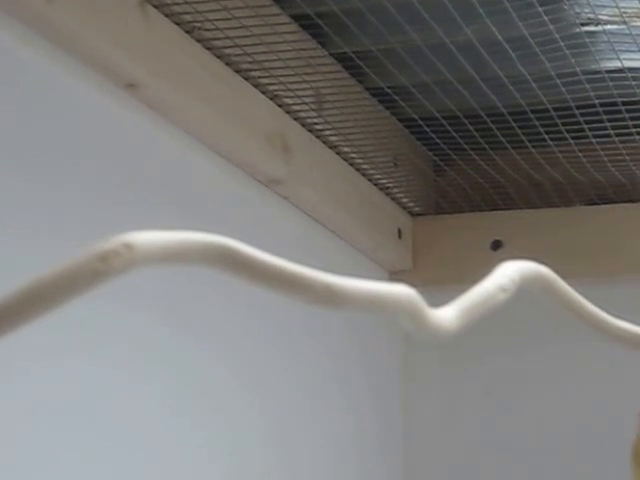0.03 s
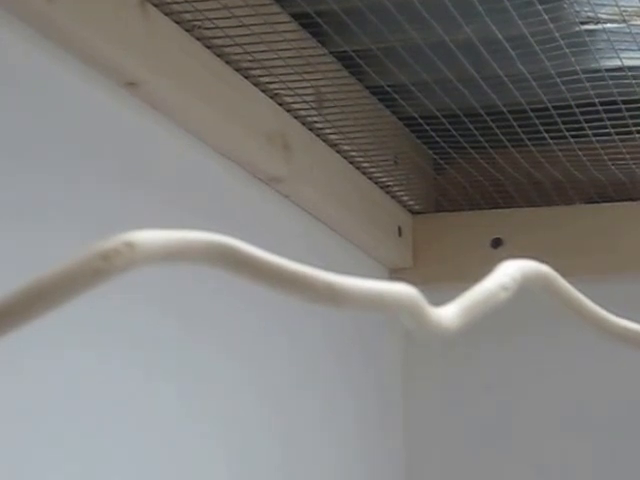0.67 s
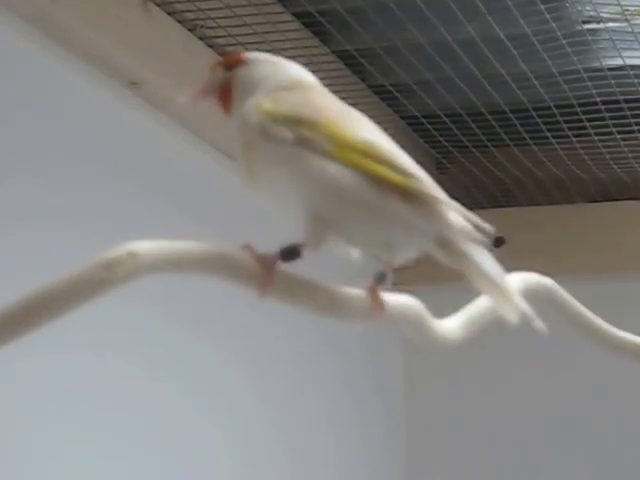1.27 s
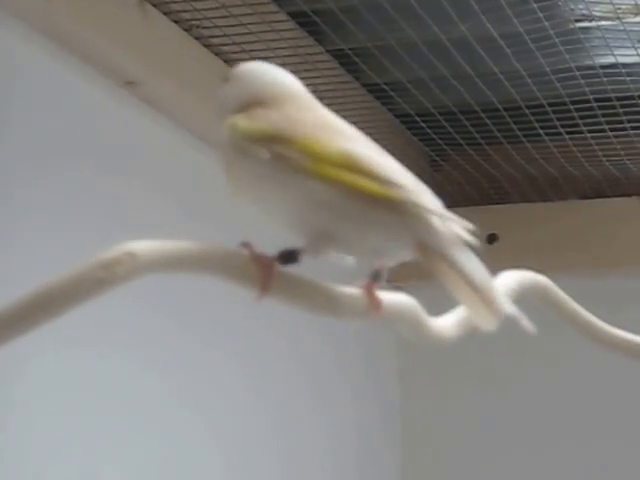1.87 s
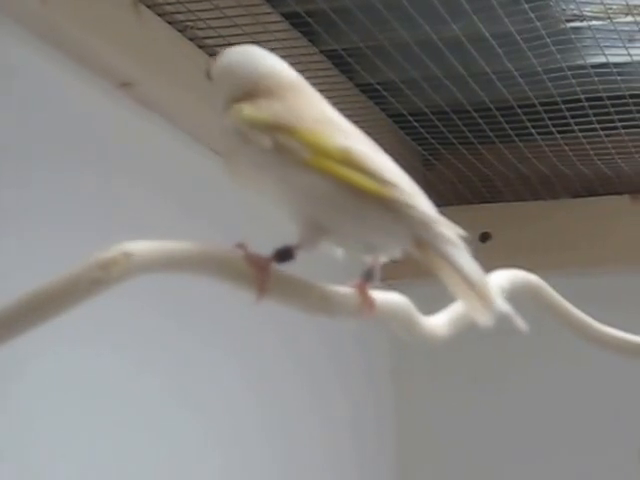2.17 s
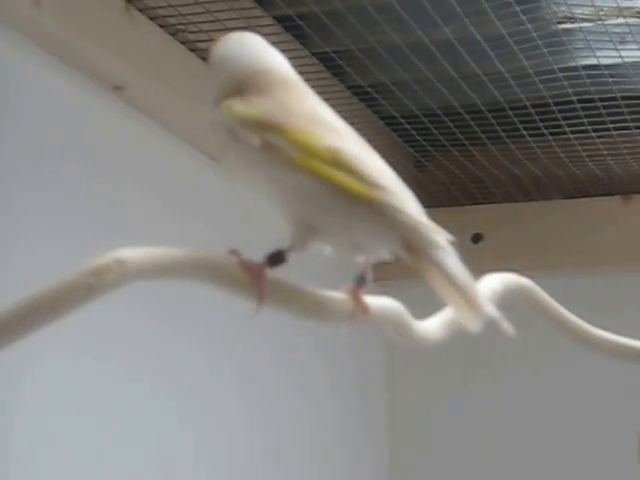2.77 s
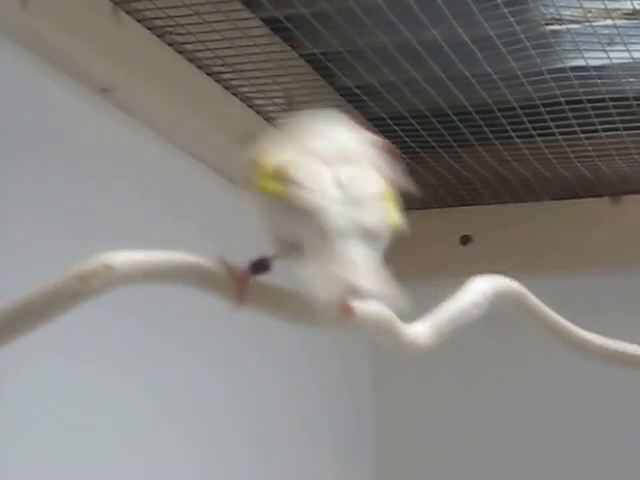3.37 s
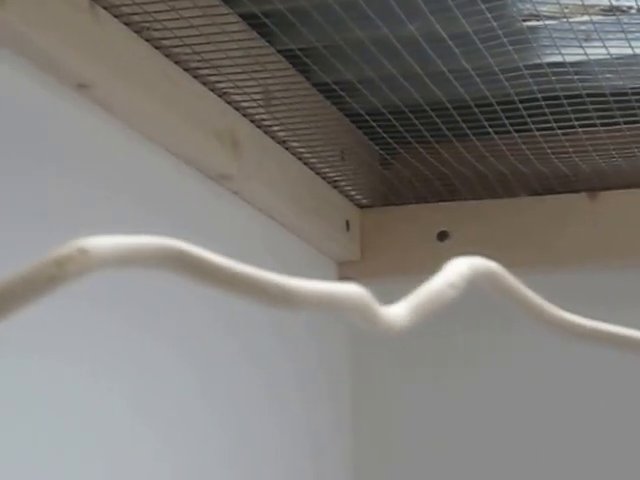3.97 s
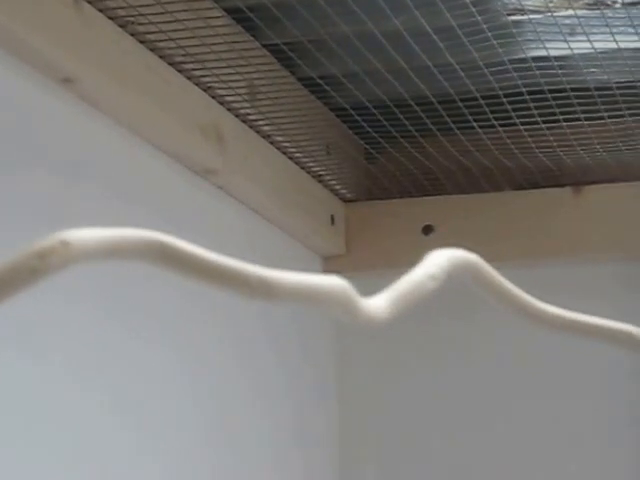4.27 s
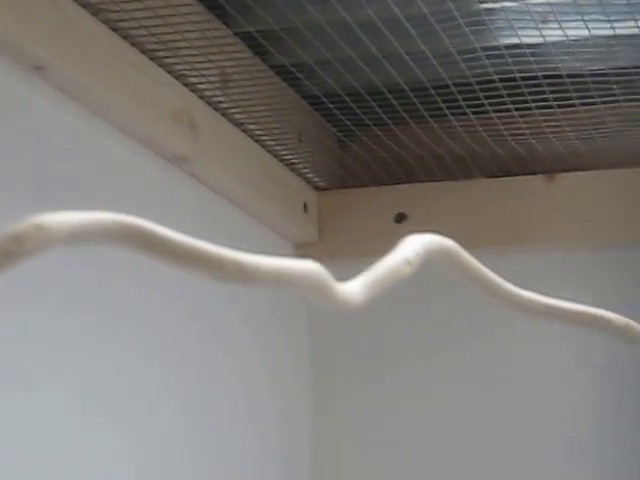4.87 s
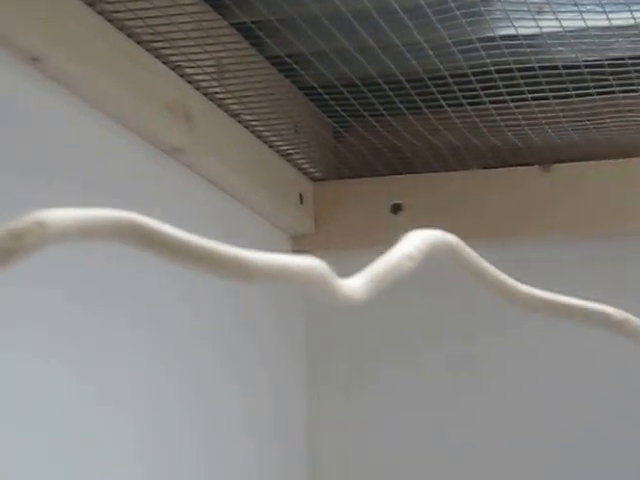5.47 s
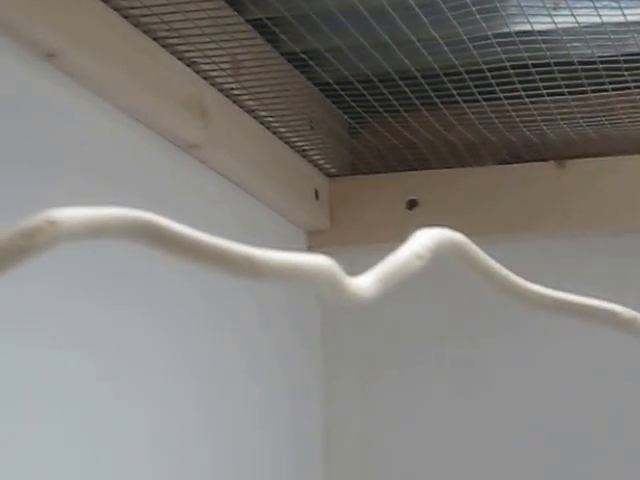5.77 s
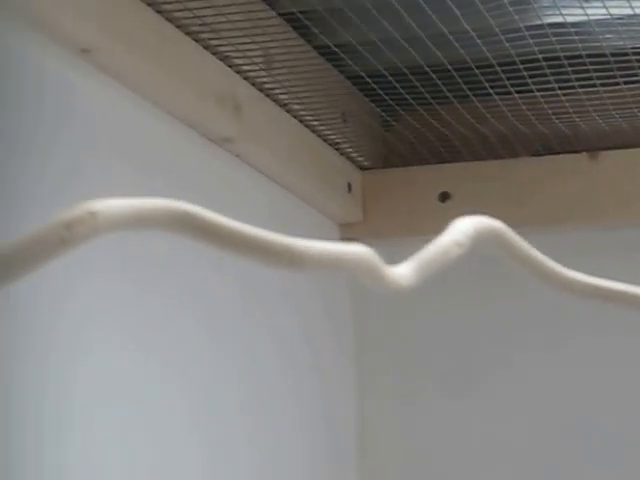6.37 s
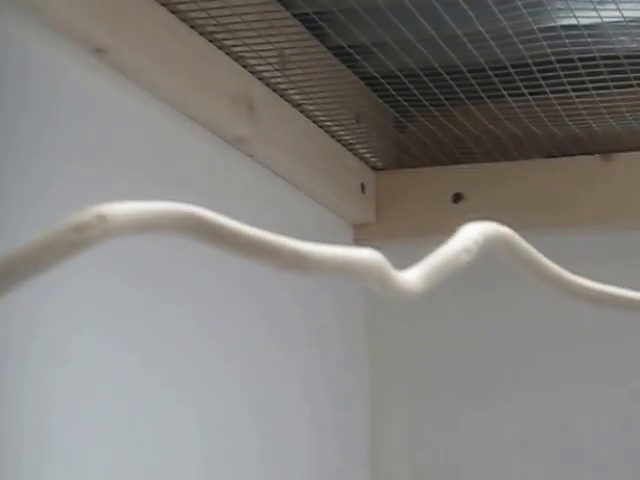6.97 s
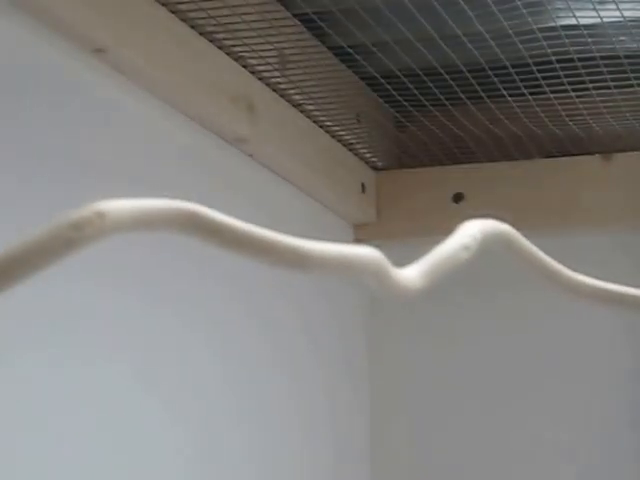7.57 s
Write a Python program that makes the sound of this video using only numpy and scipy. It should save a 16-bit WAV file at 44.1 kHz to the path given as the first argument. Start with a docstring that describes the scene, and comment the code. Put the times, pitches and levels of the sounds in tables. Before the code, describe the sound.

A goldfinch gives four sharp, close pips in a small indoor aviary, amid wing flutters, perch knocks, scattered chirps and a thin electrical whine.

```python
"""A goldfinch gives four sharp pips close to the microphone, sounding both sides of its syrinx at once.
The place is a small indoor aviary with hard walls; other birds peep, chirp and whistle further off.
Wings whirr past, feet knock on perches and wire, and feathers rustle against the mesh.
Room air and a thin electrical whine run throughout; the recorder's limiter ducks under the near pips."""
import sys
import numpy as np
from scipy import signal
from scipy.fft import rfft, irfft
from scipy.io import wavfile
from scipy.ndimage import map_coordinates

SR = 44100
rng = np.random.default_rng(int(sys.argv[2]) if len(sys.argv) > 2 else 0)


def put_to_file(sound):
    """Save the sound as 16-bit audio at rate SR, in the file named by the first command-line argument."""
    columns = np.atleast_2d(sound).T  # one column per channel
    safe = np.clip(columns, -1, 1)
    whole_steps = np.round(safe * 32767)
    wavfile.write(sys.argv[1], SR, whole_steps.astype(np.int16))


N = 336042

# spectrum of room air and microphone hiss: (frequency [Hz], level [dB])
AIR_SPECTRUM = [(20, -4), (60, -3), (110, 4), (230, 1.5), (280, 5), (380, 0.5), (580, 3), (1500, -0.5),
                (3000, -4), (5300, -5), (6400, -10.5), (8200, -1.5), (9000, -4), (10000, 0.5),
                (11700, -4.5), (12600, -14.5), (16000, -15)]
# reverberation of the hard walls: (frequency [Hz], t60 [s])
WALL_DECAY = [(150, 0.51), (1000, 0.43), (3500, 0.24), (6000, 0.24), (12000, 0.15)]
# feathers brushing the wire: (time [s], rise [s], t60 [s], level [dB], wire's ring [dB])
RUSTLES = [(4.105, 0.0038, 0.5, -32, -14), (4.271, 0.028, 0.52, -26.5, -10.5),
           (4.38, 0.033, 0.72, -36.5, -13), (5.548, 0.029, .98, -32, -12.5), (6.335, 0.019, 0.31, -24, -39),
           (6.871, 0.013, 0.12, -35, -15)]
# resonances of the brushed wire: (frequency [Hz], width [Hz], level [dB])
MESH_MODES = [(612, 29, 7.5), (1068, 194, -3), (2128, 53, 3.5), (2388, 21, 7.5), (3910, 72, -17)]
# feet and beaks on perches and wire:
# (time [s], level [dB], frequency the struck spot favours [Hz], ring [dB], thud [dB])
KNOCKS = [(0.548, -37.5, 2700, 0.5, -13), (1.509, -21.5, 5050, -1.5, -10), (1.644, -12, 810, -9.5, -15),
          (2.915, -34, 4124, -7, -15), (2.934, -31, 2680, -9, -25), (3.268, -32, 2730, -9, -20),
          (3.474, -29, 5400, -18, -19), (3.744, -30, 2310, -3, -5), (4.528, -13.5, 3100, -7.5, -25),
          (4.659, -17.5, 2900, -7, -16), (4.712, -31.5, 2300, -0.5, -16), (4.945, -39, 2260, -3, -26),
          (4.984, -34.5, 4060, 4, -43), (5.464, -28, 2270, -13, -26), (5.914, -30.5, 277, 3, -3.5),
          (6.544, -20.5, 560, -5, -15), (6.928, -29, 2670, 0, -29), (6.955, -41.5, 430, 7.5, -7)]
# modes of the wooden frame with its mesh: (frequency [Hz], level [dB], t60 [s])
FRAME_MODES = [(206, -7, 0.21), (288, 0, 0.16), (424, -5, 0.26), (579, 5.5, 0.086), (717, -6, 0.11),
               (867, 8.5, 0.031), (967, 6.5, 0.079), (1338, 9.5, 0.097), (1495, 4, .2), (1810, -1, 0.14),
               (2256, 10.5, 0.055), (2415, 4.5, 0.052), (2705, 10.5, 0.049), (3260, 4, 0.048),
               (3450, 13, 0.043), (4190, 9, 0.03), (4400, 1, 0.16), (4900, -8, 0.12), (5640, -27, 0.18)]
# spectra of the birds' movements: (frequency [Hz], level [dB])
SCRAPE_SPECTRUM = [(100, -19), (400, -6), (1000, -2), (2200, 0.5), (3600, 4), (5800, -1), (8000, -9.5),
                   (12000, -15), (16000, -32)]  # feathers on wire
THUD_SPECTRUM = [(40, -60), (110, -20), (160, -2), (200, -31.5), (330, 11.5), (450, -12), (620, 7),
                 (1000, -23.5)]  # a bird's weight landing
PERCH_SPECTRUM = [(200, -47), (450, 0), (650, -15), (850, -1), (1500, -2.5), (2200, -6.5), (3200, -4.5),
                  (4200, -38), (8000, -42)]  # a perch rattling in its seat
CLICK_SPECTRUM = [(1500, -15), (3000, 1.5), (4700, 3.5), (6000, 6.5), (7200, -9), (12000, -9), (16000, -42)]  # claws, also the snap in a pip
SWISH_SPECTRUM = [(100, -7.5), (300, -7.5), (900, -2), (2500, -0.5), (5000, -1), (8000, -3), (11000, -6.5),
                  (13000, -19), (16000, -40)]  # feathers through the air
PUSH_SPECTRUM = [(20, -40), (60, 9.5), (130, 3.5), (300, 6), (700, 1), (2000, -22.5)]  # air shoved by a wing
# flights past the microphone: (first beat [s], last beat [s], nearest point [share of the flight],
# passing time [s], swish level [dB], push level [dB])
FLIGHTS = [(0.666, 0.921, 0.68, 0.28, -30, -46), (3.509, 3.704, 1, 0.067, -34.5, -50),
           (4.149, 4.192, 0.98, 0.063, -37, -39.5), (5.224, 5.361, 0.52, 0.048, -25, -39),
           (5.438, 5.486, 0.092, 0.02, -35, -65), (6.014, 6.244, .76, 0.049, -26, -34.5),
           (6.39, 6.76, 0.7, 0.11, -25.5, -32.5)]
# far whistles: (time [s], length [s], middle pitch [Hz], glide [Hz/s], level [dB])
FAR_WHISTLES = [(1.198, 0.093, 3420, 1200, -34.5), (1.303, 0.082, 3560, 1200, -45),
                (1.371, .14, 3200, 2300, -47), (1.789, .15, 3650, -3700, -43.5),
                (1.785, 0.085, 4900, -2500, -49), (2.204, 0.13, 3800, 1700, -39.5),
                (3.323, .048, 3770, 12000, -45), (4.475, 0.21, 3736, -1800, -35),
                (4.745, .07, 3380, -4000, -46.5), (7.135, 0.12, 3155, -2300, -43.5)]
# chirps across the room: (time [s], length [s], top pitch [Hz], level [dB], step per harmonic [dB])
CHIRPS = [(.503, .04, 3280, -35, -5.5), (.639, .038, 3300, -41, -6), (0.903, 0.039, 3500, -19.5, -11),
          (1.184, 0.0084, 3435, -18, -21), (1.252, 0.026, 3445, -32.5, -12), (3.405, 0.043, 3207, -36, -5),
          (3.545, 0.045, 3310, -40, -1), (4.114, 0.032, 3523, -21, -11), (4.793, 0.037, 3210, -39, -7),
          (5.642, 0.038, 3620, -22.5, -7.5), (5.733, .036, 3550, -18.5, -10), (5.985, 0.031, 3240, -34, -3),
          (6.12, 0.045, 5160, -30.5, -11), (7.291, 0.029, 3250, -33, -5.5), (7.419, 0.023, 3375, -33, -4.5)]
# single-voiced flight calls: (time [s], length [s], pitch [Hz], level [dB])
PEEPS = [(3.604, 0.016, 4830, -14.5), (3.713, 0.031, 4700, -8.5)]
# pips close to the microphone: (time [s], length [s], rise [s], lower pitch [Hz], level [dB],
# upper voice's delay [s], its starting level re the lower [dB])
NEAR_PIPS = [(2.3294, 0.016, 0.0028, 5460, -2.5, 0.0021, -3),
             (2.428, 0.0276, 0.0024, 5018, -5.5, 0.0044, 2.5), (2.518, 0.023, 0.0051, 4884, 0.5, 0.0088, 1),
             (2.629, 0.021, 0.0063, 4860, -2, 0.0054, 0.5)]


def amp(db):
    """Decibels to gain."""
    return 10 ** (np.asarray(db) / 20)


def along(points, hz):
    """Read a (frequency, value) curve on a log frequency axis."""
    knots_hz, values = np.transpose(points)
    return np.interp(np.log(hz + 1), np.log(knots_hz + 1), values)


def clock():
    """Time axis of one event, half a second long."""
    return np.arange(SR // 2) / SR


def noise(spectrum, size=SR // 2):
    """Coloured noise of rms 1."""
    colour = amp(along(spectrum, np.fft.rfftfreq(size, 1 / SR)))
    x = irfft(rfft(rng.standard_normal(size)) * colour, size)
    return x / np.sqrt(np.mean(x ** 2) + 1e-20)


def wobble(rate, size=SR // 2):
    """A smooth random curve, rate knots a second."""
    return map_coordinates(rng.standard_normal(size // 8), [np.arange(size) * rate / SR], mode="wrap")


def gate(t, length, edge):
    """A note's envelope with rounded ends."""
    opening = np.sin(np.pi / 2 * np.clip(t / edge, 0, 1)) ** 2
    closing = np.sin(np.pi / 2 * np.clip((length - t) / edge + .5, 0, 1)) ** 2
    return opening * closing


def add(track, start, x):
    """Mix x into the track from start, in seconds."""
    i = max(round(start * SR), 0)
    track[i:i + len(x)] += x[:N - i]


def room(x, wet_db, gap_s=0.0051):
    """Direct sound plus the walls' answer, which differs for each spot in the aviary."""
    hz, t, spectra = signal.stft(rng.standard_normal(SR // 2), SR, nperseg=256)
    decay = amp(-60 * t / along(WALL_DECAY, hz)[:, None])
    tail = signal.istft(spectra * decay, SR, nperseg=256)[1][:SR // 2]
    tail *= np.clip(clock() / gap_s - 1, 0, 1)
    response = amp(wet_db) * tail / np.linalg.norm(tail)
    response[0] += 1  # direct path
    return signal.fftconvolve(x, response) / np.sqrt(1 + amp(2 * wet_db))


def room_air():
    """Room air and microphone hiss, nearly steady."""
    drift_db = .6 * wobble(5, size=N)
    return noise(AIR_SPECTRUM, size=N) * amp(-43.5 + drift_db)


def whine(pitch_hz=7570, restart_hz=30, beat_hz=292):
    """An electrical tone that keeps restarting with a faint tick; a weak neighbour beats against it."""
    t = np.arange(N) / SR
    since_restart = (t - .0184) % (1 / restart_hz)
    phase = 2 * np.pi * pitch_hz * since_restart
    neighbour = amp(-13.5) * np.sin(phase + 2 * np.pi * beat_hz * t)
    tone = np.sin(phase) + amp(-19.5) * np.sin(2 * phase)
    tick = amp(-16) * np.sin(2 * np.pi * 8600 * since_restart) * np.exp(-since_restart / 0.0009)
    highpass = signal.butter(6, 6800, "high", fs=SR, output="sos")
    return amp(-37) * signal.sosfilt(highpass, tone + neighbour + tick)


def rustles():
    """Feathers scrape in a grainy swell that dies away, and the wire mesh sings along."""
    out, t = np.zeros(N), clock()
    mesh = sum(amp(db) * width * np.exp(-np.pi * width * t) * np.sin(2 * np.pi * hz * t)
               for hz, width, db in MESH_MODES)
    for start, rise, t60, db, ring_db in RUSTLES:
        swell = np.minimum(t / rise, 1) * amp(db - 60 * np.maximum(t - rise, 0) / t60)
        scrape = noise(SCRAPE_SPECTRUM) * swell * amp(0.8 * wobble(482))
        ring = amp(ring_db) * signal.fftconvolve(scrape, mesh / np.linalg.norm(mesh))[:len(t)]
        add(out, start, room(scrape + ring, wet_db=-1.5))
    return out


def knocks(firm_db=-20, boom_below_hz=330):
    """A foot strikes: claws click, the perch clacks and chatters briefly, the frame thuds and rings."""
    out, t = np.zeros(N), clock()
    mode_hz, mode_db, t60 = np.transpose(FRAME_MODES)[:, :, None]
    for start, db, spot_hz, ring_db, thud_db in KNOCKS:
        settling = np.maximum(t - .008, 0)  # the perch first rattles in its seat
        clack = noise(PERCH_SPECTRUM) * amp(-3.5 - 60 * settling / 0.05)
        thud = noise(THUD_SPECTRUM) * amp(thud_db + 6 - 60 * t / 0.076)
        click_db = -1.5 - 0.51 * (db - firm_db)  # light touches are mostly claw
        click = noise(CLICK_SPECTRUM) * amp(click_db - 60 * t / 0.06)
        off_spot_db = 13 * (np.exp(-(np.log(mode_hz / spot_hz) / 0.2) ** 2) - 1)
        boom = amp(thud_db - 3) * (mode_hz < boom_below_hz)  # the bird's weight sets off the low modes
        drive = amp(ring_db + off_spot_db) + boom
        scatter_db = rng.normal(0, 3, mode_hz.shape)
        envelopes = drive * amp(mode_db + scatter_db - 60 * t / t60)
        modes = np.sin(2 * np.pi * (mode_hz * t + rng.random(mode_hz.shape)))
        ring = (envelopes * modes).sum(axis=0)
        contact = 1 - np.exp(-t / 0.00021)
        add(out, start, room(amp(db - 6) * contact * (clack + thud + click + ring), wet_db=-3.5))
    return out


def wingbeats(beat_s, push_falloff=2.7):
    """Even beats, loudest nearest the microphone: yields (time [s], swish [dB], push [dB])."""
    for first, last, nearest, passing, swish_db, push_db in FLIGHTS:
        nearest_s = first + nearest * (last - first)
        for time in np.linspace(first, last, round((last - first) / beat_s) + 1):
            distance_db = 20 * np.log10(np.hypot(1, (time - nearest_s) / passing))
            yield time, swish_db - distance_db, push_db - push_falloff * distance_db


def wings(beat_s=.049, swish_s=0.0094, upstroke_s=0.0069, push_s=0.017):
    """Each stroke is a sharp, crinkly swish of feathers, a slower push of air and a softer upstroke."""
    swishes, pushes = np.zeros(N), np.zeros(N)
    lead_s = .05  # a stroke swells before its peak
    t = np.arange(SR // 5) / SR - lead_s
    downstroke = np.exp(-np.abs(t / swish_s))
    upstroke = amp(-9) * np.exp(-((t - beat_s / 2) / upstroke_s) ** 2)
    for time, swish_db, push_db in wingbeats(beat_s):
        crinkle_db = 2.5 * wobble(800, size=len(t))
        swish = noise(SWISH_SPECTRUM, size=len(t)) * np.hypot(downstroke, upstroke)
        push = noise(PUSH_SPECTRUM, size=len(t)) * np.exp(-(t / push_s) ** 2)
        add(swishes, time - lead_s, amp(swish_db + 2.35 + crinkle_db) * swish)
        add(pushes, time - lead_s, amp(push_db) * push)
    return room(swishes, wet_db=-5)[:N] + pushes


def voice(pitch_hz, second_db, third_db):
    """One side of the syrinx: a sine with two overtones."""
    phase = 2 * np.pi * np.cumsum(pitch_hz) / SR
    return np.sin(phase) + amp(second_db) * np.sin(2 * phase) + amp(third_db) * np.sin(3 * phase)


def far_whistles(bend_hz_per_s2=34000, quaver_hz=125):
    """Thin quavering arches from far birds, reaching the microphone mostly off the walls."""
    out, t = np.zeros(N), clock()
    for start, length, middle_hz, glide, db in FAR_WHISTLES:
        from_middle = np.minimum(t, length) - length / 2
        arch = middle_hz + glide * from_middle - bend_hz_per_s2 * from_middle ** 2
        hoarse = amp(2 * wobble(400))
        call = voice(arch + quaver_hz * wobble(700), -30, -39) * gate(t, length, 0.0056) * hoarse
        add(out, start, room(amp(db) * call, wet_db=7))
    return out


def chirps(full_db=-20, full_s=.035, climb_hz=1053, rasp_hz=469, shine_hz=8860):
    """Upward flicks from across the room; louder, longer ones take more effort, so climb and rasp more."""
    out, t = np.zeros(N), clock()
    for start, length, top_hz, db, overtone_db in CHIRPS:
        effort = amp(db - full_db) ** 0.43 * (length / full_s) ** .75
        to_go = 1 - np.clip(t / length, 0, 1)
        rasp = rasp_hz * effort ** 0.595 * np.abs(wobble(659))
        pitch = top_hz - climb_hz * effort * to_go ** 3.5 - rasp
        # overtones stand out as they pass through a narrow band
        second_db, third_db = [(k - 1) * overtone_db + 7.5 * np.exp(-((k * pitch - shine_hz) / 190) ** 2)
                               for k in (2, 3)]
        throat_db = -12 * (1 - pitch / top_hz)  # the throat favours the top of the flick
        hoarse = amp(4 * wobble(350))
        call = voice(pitch, second_db, third_db) * gate(t, length, 0.0032) * hoarse
        add(out, start, room(amp(db + 2 + throat_db - 60 * t) * call, wet_db=-1))
    return out


def peeps(fade_db_per_s=390):
    """Short, clean, nearly level whistles of a bird taking off fairly near."""
    out, t = np.zeros(N), clock()
    for start, length, hz, db in PEEPS:
        pitch = hz * (1 + .015 * np.sin(np.pi * t / length) + .007 * wobble(250))
        call = voice(pitch, -16, -40) * gate(t, length, .004)
        add(out, start, room(amp(db - fade_db_per_s * t) * call, wet_db=-7))
    return out


def near_pips(upper_ratio=1.181, fade_db_per_s=190, upper_extra_fade_db_per_s=420):
    """Close up, both sides of the syrinx sound, the higher later; each drops onto its pitch and fades."""
    out, t = np.zeros(N), clock()
    for start, length, rise, hz, db, delay, upper_db in NEAR_PIPS:
        lower_hz = hz * (1 + 0.081 * np.exp(-t / 0.0017) + 0.0045 * wobble(540))
        lower = voice(lower_hz, -20, -40) * gate(t, length, rise)
        late = np.maximum(t - delay, 0)
        upper_hz = upper_ratio * hz * (1 + 0.12 * np.exp(-late / 0.0021) + .012 * wobble(400))
        upper = voice(upper_hz, -31, -60) * gate(late, length, 0.0026)
        upper *= amp(upper_db - upper_extra_fade_db_per_s * late)
        # a faint high overtone at the sum of the two pitches
        sum_tone = amp(-18) * np.real(signal.hilbert(lower) * signal.hilbert(upper))
        snap = amp(-24) * noise(CLICK_SPECTRUM) * gate(late, 0.007, 0.00039)
        pip = amp(db - fade_db_per_s * t) * (lower + upper + sum_tone + snap)
        add(out, start, room(pip, wet_db=-11))
    return out


def scene():
    """One microphone inside the aviary feeds both channels."""
    calls = near_pips() + peeps() + chirps() + far_whistles()
    movement = wings() + knocks() + rustles()
    mono = calls + movement + whine() + room_air()
    return np.array([mono, mono])


def limiter(x, ceiling_db, release_db_per_s, attack_s):
    """Gain falls quickly when a peak passes the ceiling, then returns at a steady rate."""
    over_db = np.maximum(20 * np.log10(np.abs(x).max(axis=0) + 1e-9) - ceiling_db, 0)
    ramp_db = release_db_per_s * np.arange(N) / SR
    held_db = np.maximum.accumulate(over_db + ramp_db) - ramp_db
    pole = np.exp(-1 / (attack_s * SR))
    return x * amp(-signal.lfilter([1 - pole], [1, -pole], held_db))


def record(dry):
    """The recorder limits the peaks and keeps nothing above its band limit."""
    limited = limiter(dry, ceiling_db=-7.5, release_db_per_s=122, attack_s=0.00096)
    in_band = np.fft.rfftfreq(N, 1 / SR) < 15780
    return irfft(rfft(limited) * in_band, N)


dry = scene()
out = record(dry)
put_to_file(out)
```